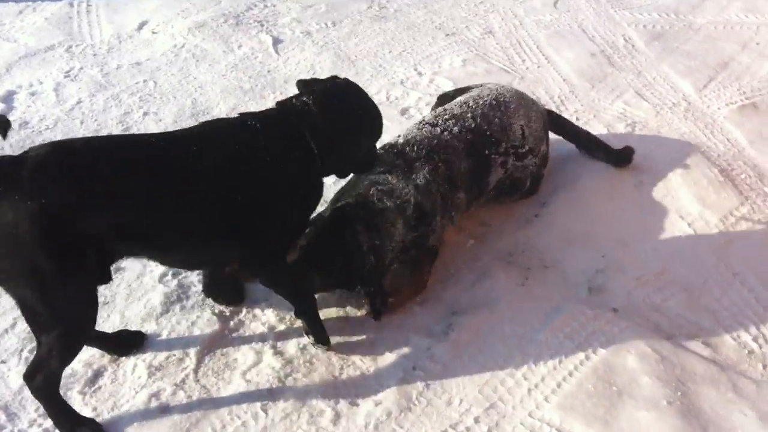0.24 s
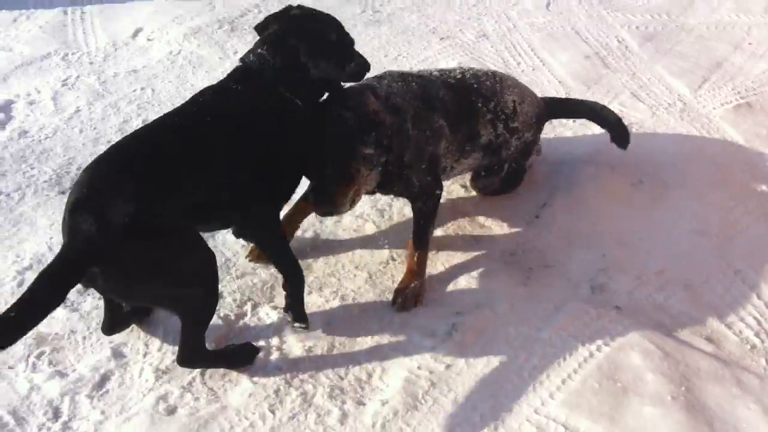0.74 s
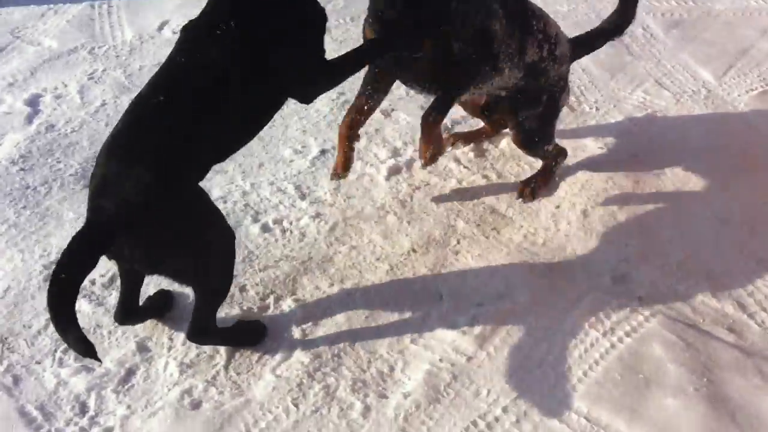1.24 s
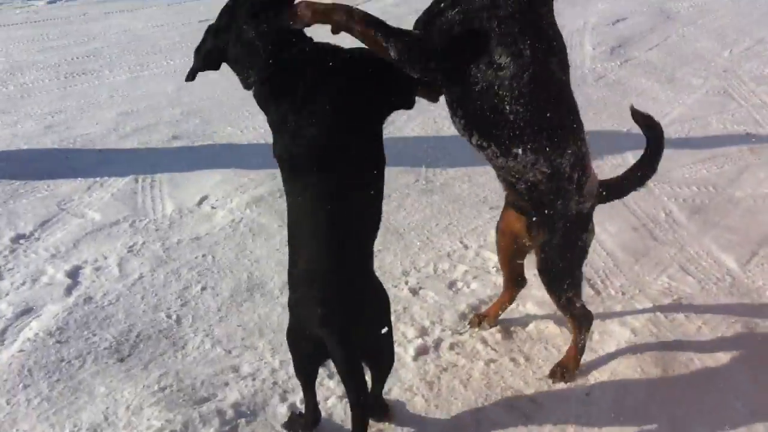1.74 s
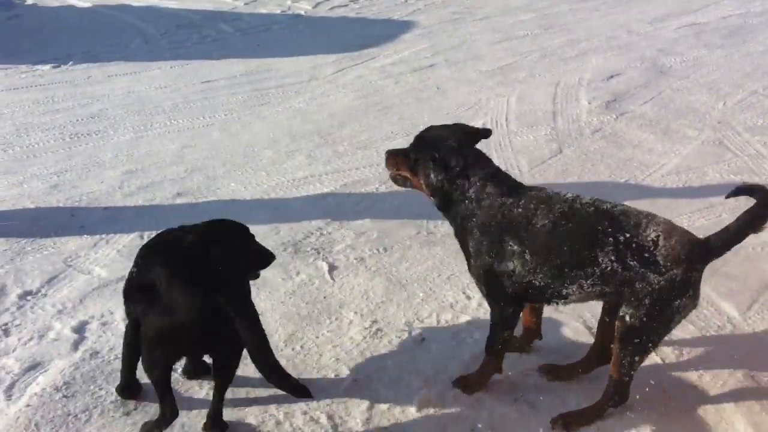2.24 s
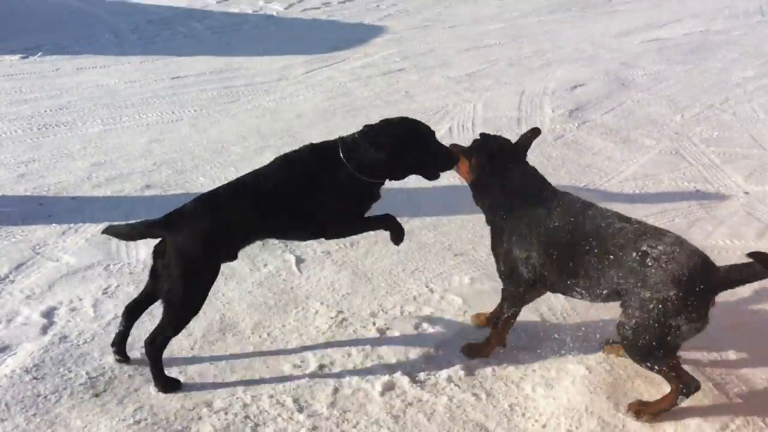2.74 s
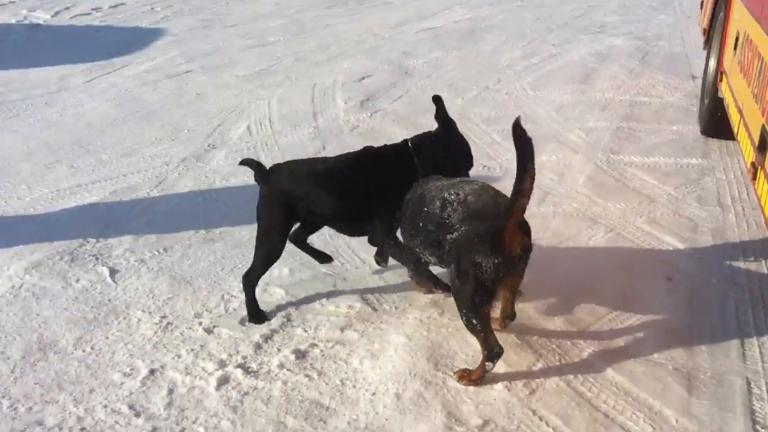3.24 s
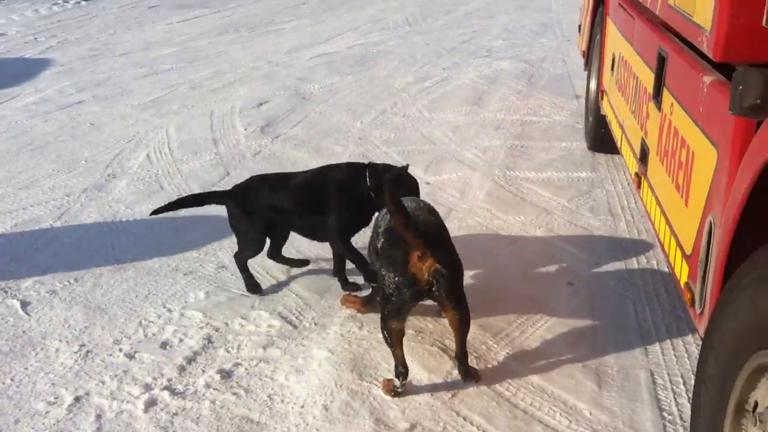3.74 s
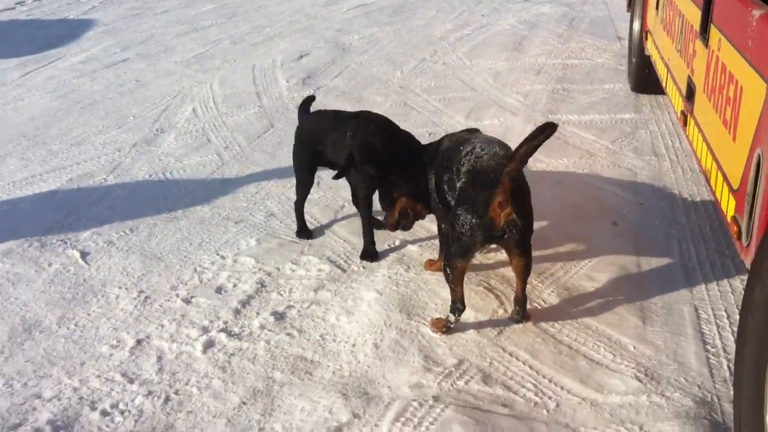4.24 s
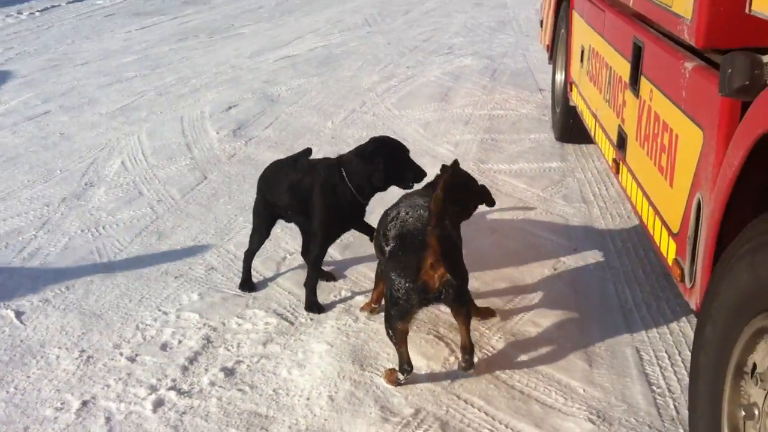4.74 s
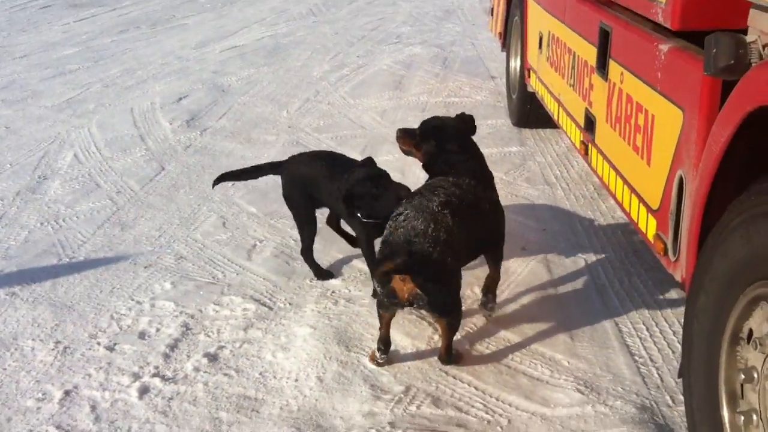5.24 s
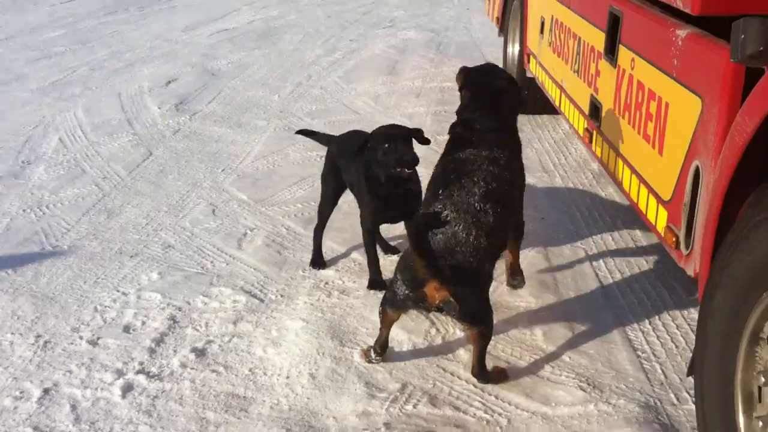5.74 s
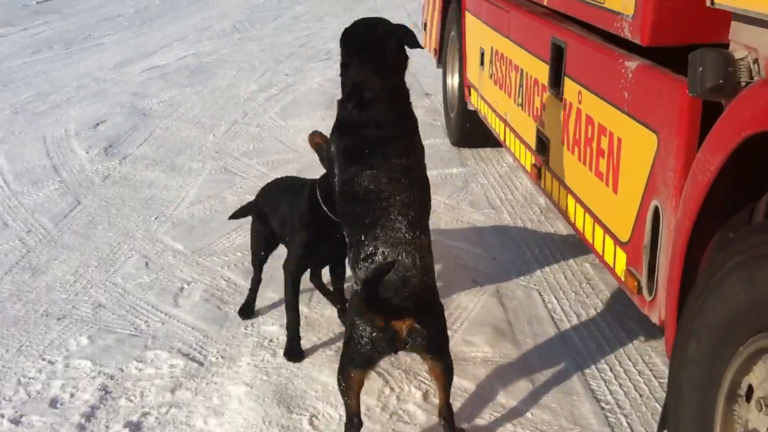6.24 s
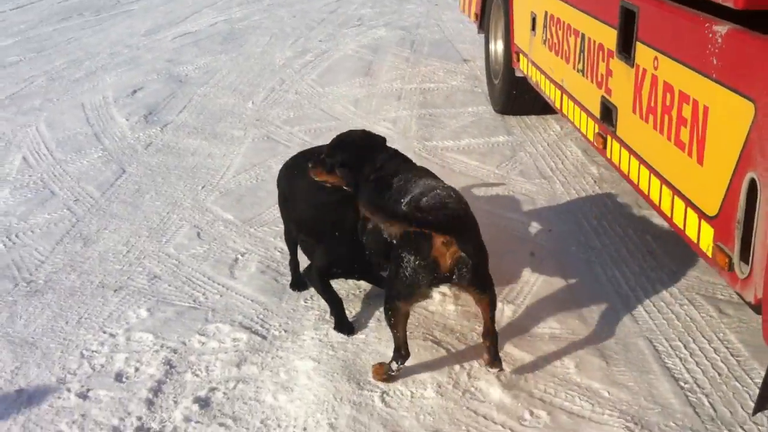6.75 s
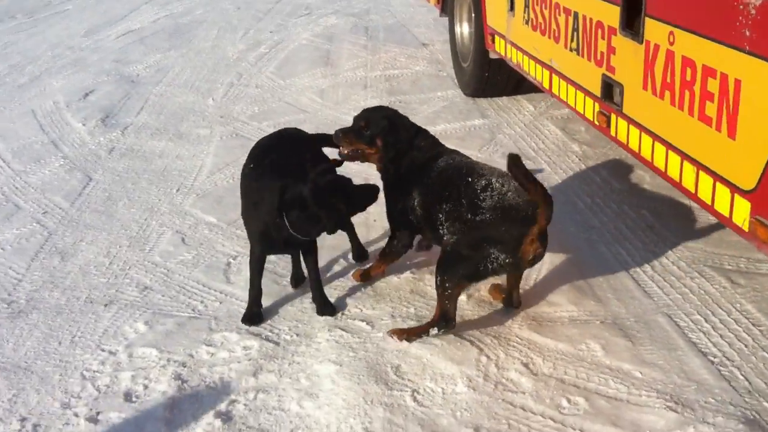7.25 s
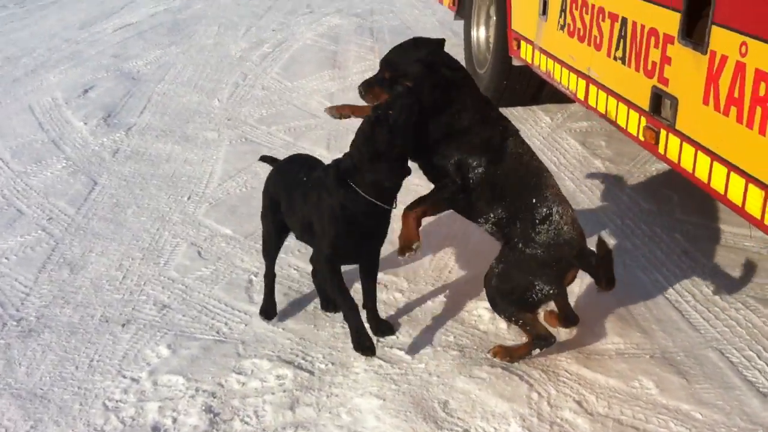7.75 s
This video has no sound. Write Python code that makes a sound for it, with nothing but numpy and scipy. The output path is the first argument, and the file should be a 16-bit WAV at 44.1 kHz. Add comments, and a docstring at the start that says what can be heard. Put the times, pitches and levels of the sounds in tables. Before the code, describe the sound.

Outdoors on packed snow, two large dogs wrestle close to a small microphone. Paws crunch, skid and spray fine grains; short breathy pants and snorts, a faint nasal whine, dull knocks and bright clicks of teeth, claws and collars punctuate the scuffle. It is busiest around two to four seconds, then quieter. Wind bumps begin lightly and swell into heavy low rumbling buffets that dominate the end.

```python
"""Two dogs wrestle on packed snow: breath noise pants, snorts and faintly whines through throat, nose and
mouth resonances, paws crunch and throw up snow as clumped grains; teeth, claws, collars, soft knocks
and the low pulses of a grunt are damped modes.
A rising wind buffets the port of a small microphone in low lumps, over smaller eddies in gusts.
Behind lie a faint outdoor hush of shaped noise and a far hum, a narrow band of noise."""
import sys
import numpy as np
from scipy import signal
from scipy.fft import rfft, irfft
from scipy.io import wavfile
from scipy.ndimage import uniform_filter1d

SR = 44100
rng = np.random.default_rng(int(sys.argv[2]) if len(sys.argv) > 2 else 0)


def boost(x):
    """Linear amplitude factor 10**(x/20) for a level x in decibels (scalar or array-like)."""
    u = np.asarray(x, float) / 20
    return 10 ** u


def transcribe(signal):
    """Save signal, clipped to [-1, 1], as a 16-bit WAV file at the path in sys.argv[1]."""
    frames = np.atleast_2d(signal).T
    limited = np.clip(frames, -1, 1)
    pcm = np.round(limited * 32767).astype(np.int16)
    wavfile.write(sys.argv[1], SR, pcm)


N = 352755


def rms_one(x):
    """Scales to rms 1."""
    return x / np.sqrt(np.mean(x ** 2) + 1e-20)


def in_time(rows):
    """Every column after the time as a curve over the samples."""
    time_s, *columns = np.transpose(rows)
    return [np.interp(np.arange(N) / SR, time_s, column) for column in columns]


def drift(rate_hz):
    """Slow chance: noise low-passed at rate_hz, spread 1."""
    pole = np.exp(-40 * np.pi * rate_hz / SR)   # computed at every 20th sample
    noise = rng.standard_normal(N // 20 + 2002)
    slow = signal.lfilter([1], [1, -2 * pole, pole * pole], noise)[2000:]
    return np.interp(np.arange(N) / 20, np.arange(len(slow)), rms_one(slow))


def evened(x, window_s):
    """Divides out the slow level, so that only the fine grain is left to chance."""
    return x / np.sqrt(uniform_filter1d(x ** 2, size=int(window_s * SR)) + 1e-12)


def colour(x, spectrum):
    """Shapes x to a (Hz, dB) spectrum, falling 18 dB per octave below its first point; rms 1."""
    hz, level_db = np.transpose(spectrum)
    grid_hz = np.maximum(np.fft.rfftfreq(N, 1 / SR), 1)
    gain_db = np.interp(np.log(grid_hz), np.log(hz), level_db)
    gain_db -= 18 * np.maximum(np.log2(hz[0] / grid_hz), 0)
    return rms_one(irfft(rfft(x) * boost(gain_db), N))


def grains(per_s, spread_db):
    """Random clicks of either sign; sizes scatter exponentially in dB, equal at spread 0."""
    sizes = boost(spread_db * np.minimum(rng.exponential(1, N), 5)) * rng.choice([-1, 1], N)
    return sizes * (rng.random(N) < per_s / SR)


def low_pass(x, hz):
    """Two-pole low-pass."""
    return signal.sosfilt(signal.butter(2, hz, fs=SR, output="sos"), x)


def resonate(x, hz, width_hz):
    """A resonance applied twice, so that the valleys beside it stay dark; gain about 1 on top."""
    r, w = np.exp(-np.pi * width_hz / SR), 2 * np.pi * hz / SR
    b, a = [(1 - r * r) / 2, 0, (r * r - 1) / 2], [1, -2 * r * np.cos(w), r * r]
    return signal.lfilter(b, a, signal.lfilter(b, a, x))


def swells(t, start_s, length_s, level_db, rise_db_per_s, fall_db_per_s):
    """Power of a sound that rises to its start, holds for its length and falls away."""
    rise_db = rise_db_per_s * np.maximum(start_s - t, 0)
    fall_db = fall_db_per_s * np.maximum(t - start_s - length_s, 0)
    return boost(level_db - rise_db - fall_db) ** 2


def summed_db(base_db, start_s, length_s, level_db, rise_db_per_s, fall_db_per_s):
    """Level of a base sound with swells on top, adding in power."""
    t = np.arange(0, N, 20) / SR
    power = swells(t[:, None], start_s, length_s, level_db, rise_db_per_s, fall_db_per_s).sum(axis=1)
    return 10 * np.log10(boost(base_db) ** 2 + np.interp(np.arange(N) / SR, t, power))


# pants, snorts and a faint nasal whine:
# start_s, length_s, level_db, throat_hz (throat or nose resonance), throat_db, mouth_hz
BREATHS = [(0.537, 0.093, -59.5, 3280, 9, 1790), (0.724, 0.054, -45.5, 610, 18, 983),
           (1.339, 0.11, -56.5, 4600, 11, 2530), (1.697, 0.084, -54, 670, 14, 914),
           (2.024, 0.15, -52, 610, -13, 890), (2.223, 0.0098, -37, 923, 23, 923),
           (2.241, 0.119, -40.5, 375, 6, 933), (2.394, 0.027, -48, 633, 14, 1100),
           (3.305, 0.068, -54, 756, 23, 1080), (3.821, 0.17, -47, 730, 15, 990),
           (4.438, 0.073, -54.5, 2530, -3, 910), (4.641, 0.057, -52, 710, 13, 923),
           (5.08, 0.072, -56, 1330, 5, 967), (5.378, 0.039, -52.5, 810, 15, 1222),
           (5.689, 0.075, -54.5, 2580, -2, 930), (6.508, 0.054, -47, 660, 32, 885),
           (7.529, 0.093, -50, 753, 14, 1100)]
# open mouth as a tube: multiple (of mouth_hz), width_hz (of one resonator pass), mode_db (before tilt)
MOUTH_MODES = [(1, 257, 11.5), (1.88, 110, 1), (2.25, 200, 4.5), (3.3, 200, -6), (4.2, 200, -4),
               (5.15, 300, 1), (5.85, 200, -1.5)]


def breaths():
    """Fluttering breath noise through throat or nose and open mouth, newly shaped for each breath."""
    tilt_db_per_octave = -2.5
    rasp_db, rasp_band_hz = -11, [600, 2900]   # broad rasp between the resonances
    wander_db, wander_hz = 3.0, 22   # each upper resonance swells and fades as tongue and jaw move
    glide_octaves_per_s = -0.25   # the resonances sink as the mouth closes
    wobble_octaves = 0.02   # and wobble as the jaw shakes
    sag_db_per_s = 55   # the lungs empty during a breath
    out = np.zeros(N)
    air = rng.standard_normal(N)
    flutter = boost(1.1 * drift(45))
    rasp = signal.sosfilt(signal.butter(2, rasp_band_hz, "band", fs=SR, output="sos"), air)
    wander = [boost(wander_db * (k > 0) * drift(wander_hz)) for k in range(len(MOUTH_MODES))]
    wobble = wobble_octaves * drift(wander_hz)
    for start_s, length_s, level_db, throat_hz, throat_db, mouth_hz in BREATHS:
        a, b = round((start_s - 0.1) * SR), round((start_s + length_s + 0.15) * SR)
        sound = boost(throat_db) * resonate(air[a:b], throat_hz, width_hz=40 + 0.15 * throat_hz)
        sound += boost(rasp_db) * rasp[a:b]
        for k, (multiple, width_hz, mode_db) in enumerate(MOUTH_MODES):
            gain = boost(mode_db + tilt_db_per_octave * np.log2(multiple)) * wander[k][a:b]
            sound -= (-1) ** k * gain * resonate(air[a:b], multiple * mouth_hz, width_hz)
        t = np.arange(a, b) / SR
        # glide and wobble by reading the sound at a changing speed
        speed = 2 ** (glide_octaves_per_s * (t - t.mean()) + wobble[a:b])
        read_at = np.cumsum(speed) * (b - a - 1) / speed.sum()
        sound = np.interp(read_at, np.arange(b - a), sound)
        envelope = np.sqrt(swells(t, start_s, length_s, level_db, rise_db_per_s=500, fall_db_per_s=300))
        sag = boost(-sag_db_per_s * np.clip(t - start_s, 0, length_s))
        out[a:b] += envelope * sag * evened(sound, 0.02) * flutter[a:b]
    return out


# constant shuffling on the snow: time_s, crunch_db, spray_db
SHUFFLE = [(0.0, -75, -59), (0.27, -63, -63.5), (1.18, -69, -63.5), (1.42, -65.5, -67.5),
           (3.12, -56.5, -58.5), (4.52, -66.5, -66.5), (5.9, -69, -66), (7.55, -66, -62.5),
           (8.0, -61.5, -65)]
# paws land, skid or dig: start_s, length_s, crunch_db, spray_db
STEPS = [(0.045, 0.0097, -52.5, -53.5), (0.108, 0.073, -60.5, -57), (0.355, 0.053, -57, -72),
         (0.466, 0.0086, -57, -54.5), (0.628, 0.017, -75, -56), (0.734, 0.08, -59, -55),
         (.88, 0.15, -61.5, -59), (1.114, 0.015, -59, -51.5), (1.198, 0.13, -62, -57),
         (1.33, 0.092, -58, -81), (1.819, 0.075, -63, -58), (2.02, 0.024, -71, -56.5),
         (2.203, 0.13, -49.5, -54), (2.41, 0.034, -54, -59), (2.55, 0.19, -62, -56.5),
         (2.665, 0.014, -52, -51), (2.87, 0.1, -57.5, -56.5), (3.022, 0.04, -54, -67),
         (3.225, 0.038, -54.5, -53.5), (3.32, 0.034, -54.5, -58.5), (3.437, 0.064, -58.5, -59.5),
         (3.61, 0.16, -71, -59.5), (3.839, 0.035, -52, -57.5), (3.928, 0.057, -71, -56),
         (4.448, 0.084, -57, -63), (4.6, 0.075, -62.5, -63.5), (4.857, 0.077, -67, -58),
         (5.013, 0.12, -60.5, -69), (5.299, 0.0075, -71, -58), (5.67, 0.31, -65.5, -66),
         (6.436, 0.019, -61.5, -60.5), (6.532, 0.082, -60.5, -66), (6.782, 0.11, -62, -60.5),
         (6.912, 0.069, -56.5, -63.5), (7.037, 0.14, -58, -55), (7.434, 0.076, -63, -60.5),
         (7.52, 0.093, -55, -62.5), (7.617, 0.096, -59, -58.5), (7.786, 0.062, -56.5, -64)]
# spectrum of breaking crystals: freq_hz, relative level_db (per Hz)
CRUNCH_SPECTRUM = [(400, 18), (900, 9.5), (1500, 13), (2500, 12.5), (4000, 1), (7000, -9)]
# spectrum of thrown snow: freq_hz, relative level_db (per Hz)
SPRAY_SPECTRUM = [(2500, 3.5), (5000, 4.5), (8000, 2), (11500, 3.5), (16000, -4.5)]


def paws():
    """Crystals break under the paws in clumps; the finer spray is a dense bright hiss in spurts."""
    start_s, length_s, *step_dbs = np.transpose(STEPS)
    crunch_db, spray_db = [
        summed_db(base_db, start_s, length_s, step_db, rise_db_per_s=526, fall_db_per_s=314)
        for base_db, step_db in zip(in_time(SHUFFLE), step_dbs)]
    crunch = colour(grains(2500, spread_db=0.0) * boost(2.26 * drift(43)), CRUNCH_SPECTRUM)
    spray = colour(grains(9000, spread_db=-0.5) * boost(1.69 * drift(44)), SPRAY_SPECTRUM)
    return boost(crunch_db) * evened(crunch, 0.089) + boost(spray_db) * evened(spray, 0.1)


# teeth, claws, collars, soft knocks and the low pulses of a grunt: peak_s, peak_db, pitch_hz, t60_s
CLICKS_AND_PULSES = [(0.348, -37.5, 1910, 0.03), (0.444, -28.5, 880, 0.008), (0.4625, -35, 2300, 0.008),
                     (0.486, -29, 900, 0.01), (1.297, -40.5, 467, .04), (1.396, -39, 457, 0.07),
                     (1.417, -41, 476, 0.062), (1.5163, -41.5, 2450, 0.039), (1.668, -49, 2100, 0.03),
                     (1.837, -32.5, 1710, 0.029), (2.188, -36, 950, 0.037), (2.679, -26.5, 814, 0.015),
                     (2.772, -37.5, 646, 0.018), (2.868, -32, 665, 0.017), (3.0072, -40, 2190, 0.019),
                     (3.0092, -24, 2295, 0.0091), (3.0093, -35, 5200, 0.012), (3.0108, -31.5, 680, 0.019),
                     (3.053, -30.5, 654, 0.05), (3.609, -43.5, 754, 0.017), (3.6726, -34, 4050, 0.022),
                     (3.686, -34, 5800, 0.011), (3.692, -28, 4500, 0.0057), (3.6913, -27, 11540, 0.015),
                     (3.7042, -30, 11200, 0.0058), (3.724, -37, 344, 0.023), (3.762, -30.5, 9400, 0.006),
                     (4.199, -38.5, 420, 0.05), (5.133, -39.5, 452, 0.028), (6.51, -42, 694, 0.03),
                     (6.599, -45.5, 2640, 0.079), (7.074, -35, 9100, 0.017), (7.149, -35, 970, 0.0097),
                     (7.518, -31.5, 12870, 0.0044), (7.768, -41, 785, 0.063), (7.831, -36.5, 1050, 0.03)]


def clicks_and_pulses():
    """A broad crack, a damped mode at the listed pitch and a noisy ring spread widely around it."""
    out, t = np.zeros(N + 2000), np.arange(1500) / SR
    noises = rng.standard_normal((len(CLICKS_AND_PULSES), 1500))
    for (peak_s, peak_db, pitch_hz, t60_s), noise in zip(CLICKS_AND_PULSES, noises):
        band_hz = [pitch_hz / 1.74, min(pitch_hz * 2.0, 19000)]
        band = signal.butter(2, band_hz, "band", fs=SR, output="sos")
        ring = np.sin(2 * np.pi * pitch_hz * t) + 0.7 * rms_one(signal.sosfilt(band, noise))
        fade = np.minimum(t / 0.00035, 1) * boost(-60 * t / max(t60_s, 0.003))
        crack = 0.55 * low_pass(noise, min(9 * pitch_hz, 19000)) * np.exp(-t / 0.0003)
        pulse = ring * fade + crack
        size = np.abs(pulse)
        at = round(peak_s * SR) - size.argmax()
        out[at:at + len(t)] += boost(peak_db) * pulse / size.max()
    return out[:N]


def port_bass_cut(x):
    """The port passes little below 83 Hz: a two-pole high-pass."""
    return signal.sosfilt(signal.butter(2, 83, "high", fs=SR, output="sos"), x)


# strongest buffets: centre_s, height_db (of the swing before the bass cuts), pitch_hz
BUFFETS = [(1.994, -29.5, 168), (3.015, -36, 200), (3.188, -27.5, 264), (3.762, -33.5, 294),
           (4.507, -28.5, 155), (4.542, -17.5, 160), (4.605, -21, 280), (5.411, -22.5, 200),
           (5.911, -22, 270), (5.932, -23.5, 334), (5.969, -14, 312), (5.981, -14.5, 200),
           (6.615, -20, 176), (6.831, -23, 279), (6.872, -20.5, 207), (6.9, -13, 255), (6.949, -21, 268),
           (7.054, -22.5, 185), (7.117, -17.5, 176), (7.383, -18.5, 292), (7.463, -12, 209),
           (7.594, -18.5, 220), (7.711, -23.5, 257), (7.75, -25, 194), (7.801, -19.5, 190),
           (7.902, -16.5, 295), (7.912, -34, 254), (7.925, -12, 200), (7.951, -20.5, 268)]


def buffets():
    """Each big eddy: a few swings that swell and die, with a sharp flick; also its share of the flow."""
    # quicker buffets carry a stronger flick: level beside the swing at 200 Hz, growth with pitch
    flick_db, flick_db_per_octave = -21, 33.5
    out, share = np.zeros(N + 4000), np.zeros(N + 4000)
    t = np.arange(-1000, 1000) / SR
    turns = rng.random((len(BUFFETS), 2))
    for (centre_s, height_db, pitch_hz), turn in zip(BUFFETS, turns):
        swell = np.exp(-(t * pitch_hz / np.where(t < 0, 0.8, 1.2)) ** 2)
        lump = swell * np.cos(2 * np.pi * (pitch_hz * t + turn[0]))
        flick = np.cos(2 * np.pi * (480 * t + turn[1])) / np.cosh((t - 0.002) / 0.00059)
        flick_gain = boost(flick_db + flick_db_per_octave * np.log2(pitch_hz / 200))
        at = round(centre_s * SR) - 1000
        out[at:at + len(t)] += boost(height_db) * (lump + flick_gain * flick)
        share[at:at + len(t)] += swell
    return port_bass_cut(out[:N]), np.minimum(share[:N], 1)


def port(x):
    """The port booms at one low resonance and the bass below it is cut steeply."""
    boom_hz, width_hz = 155.5, 89
    r, w = np.exp(-np.pi * width_hz / SR), 2 * np.pi * boom_hz / SR
    boom = signal.lfilter([1, -1], [1, -2 * r * np.cos(w), r * r], x + 1e-18)
    return port_bass_cut(boom)


# breeze at the port between the gusts: time_s, level_db
BREEZE = [(0.0, -61), (5.39, -62.5), (5.5, -56), (5.93, -57), (6.06, -52.5), (6.71, -43.5), (6.97, -40),
          (7.66, -45.5), (8.0, -42)]
# gusts: start_s, length_s, level_db
GUSTS = [(1.204, 0.012, -45), (1.26, 0.14, -52), (1.667, 0.011, -46), (1.734, 0.02, -41.5),
         (1.832, 0.031, -48), (1.977, 0.054, -44), (2.161, 0.024, -49.5), (2.665, 0.024, -37.5),
         (2.875, 0.013, -42.5), (3.04, 0.066, -47), (3.124, 0.082, -39), (3.453, 0.035, -50.5),
         (4.34, 0.044, -51.5), (4.538, 0.07, -33), (4.795, 0.061, -37), (4.946, 0.09, -47),
         (5.357, 0.15, -40.5), (5.401, 0.14, -36), (5.635, 0.077, -45.5), (5.9, 0.097, -26),
         (6.017, 0.089, -43.5), (6.154, 0.062, -41), (6.237, 0.05, -40.5), (6.382, 0.023, -38),
         (6.45, 0.06, -36), (6.59, 0.053, -35.5), (6.835, 0.17, -28.5), (7.049, 0.1, -29),
         (7.228, 0.049, -33.5), (7.372, 0.038, -25), (7.452, 0.061, -28), (7.57, 0.033, -30),
         (7.663, 0.11, -30.5), (7.898, 0.016, -20), (7.955, 0.01, -31)]


def wind():
    """Eddies pass the port as pressure jolts in clumps; a stronger wind makes them sharper."""
    sharp_db, sharp_db_per_db = -7, 0.4   # share of sharp jolts at a -20 dB gust, growth with the gust
    breeze_db = in_time(BREEZE)[0]
    gust_db = summed_db(breeze_db, *np.transpose(GUSTS), rise_db_per_s=904, fall_db_per_s=587)
    eddies = grains(500, spread_db=4.0) * boost(4.5 * drift(19.6))
    soft = rms_one(port(low_pass(low_pass(eddies, hz=294), hz=422)))
    jolts = grains(400, spread_db=1.5)
    sharp = rms_one(port(low_pass(low_pass(jolts, hz=664), hz=1050)))
    sharp_gain = boost(sharp_db + sharp_db_per_db * (gust_db + 20.0))
    return boost(gust_db) * evened(soft + sharp_gain * sharp, 0.065)


# outdoor hush: freq_hz, relative level_db (per Hz)
HUSH_SPECTRUM = [(35, -57), (60, -0.5), (215, 6.5), (403, -1.5), (999, 2.5), (2100, -13.5), (7540, -59),
                 (11700, -19), (15500, -18.5)]


def hush():
    """Steady shaped noise of the open air."""
    level_db = -58
    return boost(level_db) * colour(rng.standard_normal(N), HUSH_SPECTRUM)


# far hum: time_s, level_db
HUM_LEVEL = [(0, -61), (1.2, -63), (2, -72), (8, -76)]


def hum():
    """Noise through one narrow resonance, heard as an unsteady low tone."""
    tone = resonate(rng.standard_normal(N), hz=231.4, width_hz=34)
    return boost(in_time(HUM_LEVEL)[0]) * evened(tone, 0.058)


def scene():
    """Dogs, the wind at the port, the hush and the far hum."""
    dogs = breaths() + paws() + clicks_and_pulses()
    big, share = buffets()
    air = big + wind() * (1 - 0.061 * share)   # a big eddy sweeps the small ones aside
    return (dogs + air + hush() + hum())[None]


def band_limit(x):
    """A steep low-pass at the top of the band."""
    return signal.sosfilt(signal.butter(12, 16360, fs=SR, output="sos"), x)


def record(dry):
    """One microphone: bass cut, the biggest jolts rounded, top cut."""
    bass_cut = signal.butter(3, 62, "high", fs=SR, output="sos")
    top_cut = signal.ellip(12, 0.5, 70, 15720, fs=SR, output="sos")   # ripple dB, stop dB, Hz
    limit = 0.34
    rounded = limit * np.tanh(signal.sosfilt(bass_cut, dry) / limit)
    mix = signal.sosfilt(top_cut, rounded)
    return band_limit(mix)


dry = scene()
out = record(dry)
transcribe(out)
```